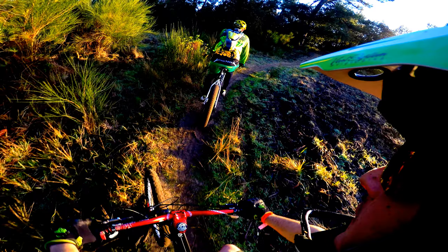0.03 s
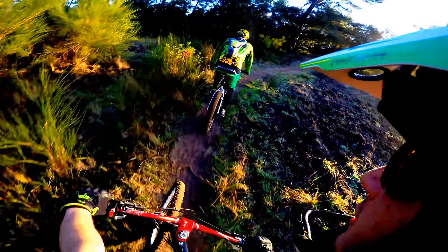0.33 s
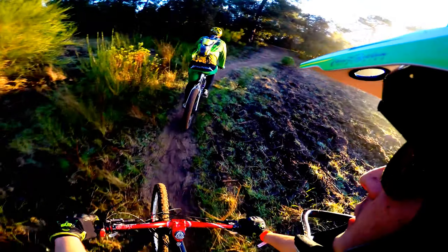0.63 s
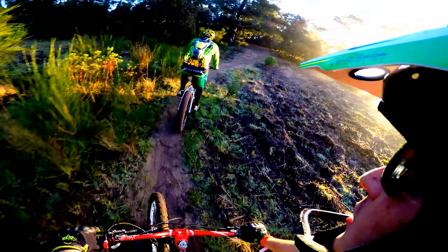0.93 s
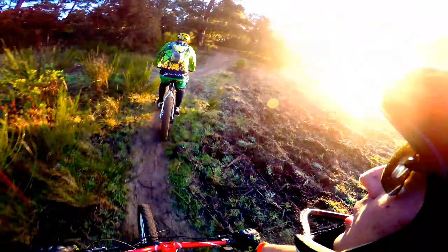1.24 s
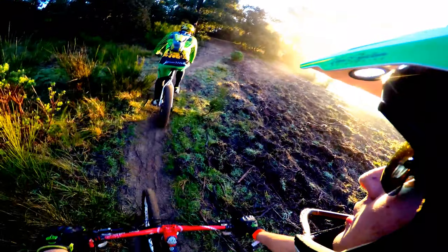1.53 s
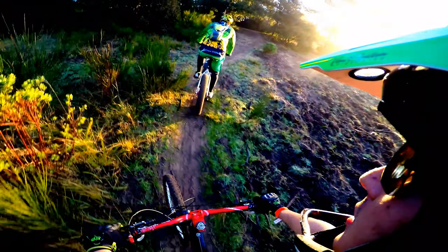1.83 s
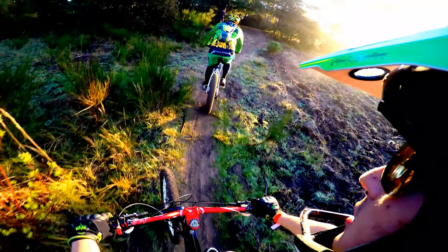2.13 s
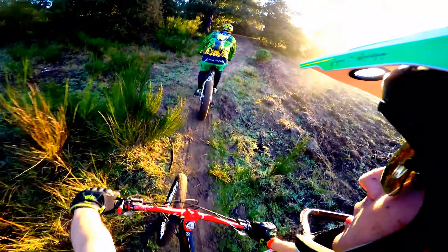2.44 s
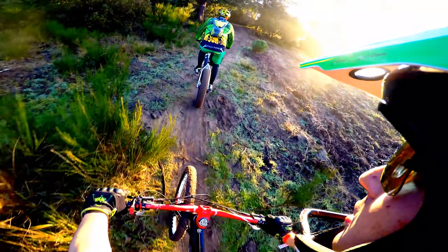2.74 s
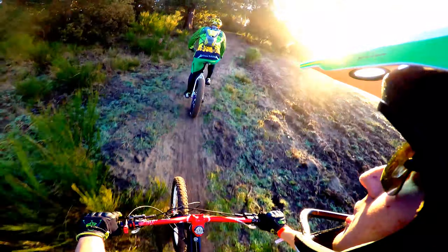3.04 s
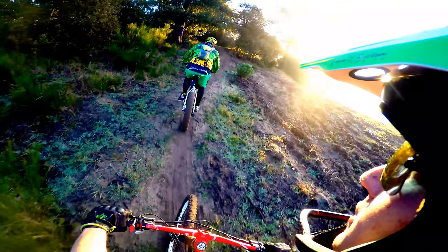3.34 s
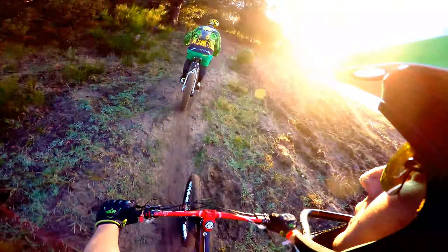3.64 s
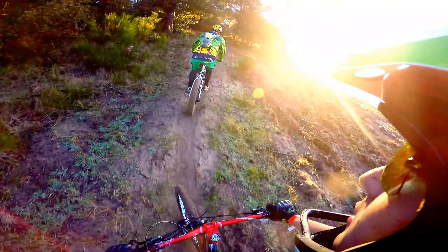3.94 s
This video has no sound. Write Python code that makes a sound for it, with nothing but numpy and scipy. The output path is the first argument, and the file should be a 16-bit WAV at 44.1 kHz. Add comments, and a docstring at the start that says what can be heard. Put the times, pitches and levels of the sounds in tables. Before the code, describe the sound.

Low, gusty wind rumbles on the microphone on a mountain bike rider's helmet. Beneath it, tyres crunch along a dirt trail with small rattles and brushing plants. Twigs crack against the bike halfway through, followed by a bump and one last twig.

```python
"""A mountain bike on a dirt trail, heard from a camera on the rider's helmet.
It cuts in on wind buffeting the mic, tyres droning over grit, loose parts ticking and a shrub
swishing past. A bump booms, a thin ring grazes by, then eddies thump and the tread briefly hums.
Around two seconds in, twigs snap against the bike and set its metal clacking; more rattles, another
bump and a last twig follow. The camera's case colours the bike and the plants, but not the wind."""
import sys
import numpy as np
from scipy import signal
from scipy.fft import rfft, irfft
from scipy.io import wavfile
from scipy.ndimage import uniform_filter1d

SR = 44100
rng = np.random.default_rng(int(sys.argv[2]) if len(sys.argv) > 2 else 0)


def pcm_store(signal):
    """Save signal as 16-bit PCM."""
    levels = np.round(np.clip(np.atleast_2d(signal), -1, 1) * 32767)
    wavfile.write(sys.argv[1], SR, levels.astype(np.int16).T)


N = 176400
TIME = np.arange(N) / SR

# wind on the mic: t/s, buffet level/dB, flutter level/dB
GUSTS = [(.1, -37, -51), (.53, -38, -53), (.6, -37, -48), (.89, -32.5, -44), (1.19, -30, -47),
         (1.31, -27, -34.5), (1.4, -30, -42), (1.9, -35.5, -42.5), (2.0, -24, -39.5), (2.18, -29, -39),
         (2.3, -24.5, -31.5), (2.38, -25, -37), (2.66, -28.5, -37.5), (2.92, -33, -40.5), (3.2, -27, -39),
         (3.4, -28.5, -35.5), (3.68, -32.5, -35), (3.97, -26.5, -38)]
# EQ curves of deep buffet, faster flutter, tread, dirt, leaves and twig crack: f/Hz, level/dB
BUFFET_EQ = [(8, -12), (22, -1), (38, 0), (62, -2), (88, -10), (140, -26), (300, -55), (900, -90)]
FLUTTER_EQ = [(40, -32.5), (90, 4.5), (125, 0.5), (200, -9), (300, -17.5), (450, -33.5), (800, -53),
              (3000, -62.5)]
TREAD_EQ = [(80, -4), (220, -3), (320, 1.5), (420, -2), (540, -10), (700, -20.5), (1100, -31.5),
            (4000, -63)]
DIRT_EQ = [(200, 8.5), (700, 4), (1050, 0), (1450, 1), (2300, -1.5), (3800, -4.5), (5200, -5), (6200, -7.5),
           (6900, -13), (9000, -16), (15000, -18)]
LEAF_EQ = [(300, -20), (900, -8), (1500, -1.5), (3000, 0), (3600, -5), (5400, -3), (7200, -11), (9500, -20),
           (13000, -22), (15000, -29)]
CRACK_EQ = [(800, -22), (2000, -9), (2900, 0), (5000, -3.5), (7000, -14), (10000, -21), (13000, -18),
            (15000, -28)]
# tyres on the ground: t/s, drone level/dB, dirt level/dB
ROLL = [(.1, -48, -59.5), (.2, -53.5, -55.5), (.3, -51.5, -56), (.5, -49, -56), (.85, -51.5, -58),
        (1.0, -50.5, -58), (1.3, -48.5, -57.5), (1.7, -51, -57.5), (2.2, -48.5, -54), (2.42, -52.5, -60.5),
        (2.62, -45.5, -57.5), (2.82, -52, -56.5), (3.25, -50, -59.5), (3.42, -48.5, -55), (3.7, -50, -57.5),
        (3.98, -51, -57)]
# plants brushing past: peak t/s, level/dB, rise/s, fall/s, brightness/dB
SWISHES = [(.1, -57, 0.022, 0.036, 5.5), (.54, -64.5, 0.04, 0.04, 14), (1.0, -69, 0.045, 0.057, 26),
           (1.475, -58.5, 0.035, 0.042, 15), (1.963, -52.5, 0.018, 0.03, 6),
           (2.083, -49.5, 0.03, 0.048, -4), (2.47, -62.5, 0.077, 0.075, 7), (3.42, -62.5, 0.11, 0.093, -37),
           (3.5, -67, 0.057, 0.028, 15), (3.86, -61.5, .012, 0.038, 14)]
# modes of spokes and frame: f/Hz, level/dB, t60/s
METAL_MODES = [(2584, -3, .028), (2915, -1, .055), (3235, 0, .036), (3840, 0, .03), (4620, -1, .05),
               (5400, -4, .03)]
# knocks of loose parts and stones: t/s, level/dB, f/Hz, width/octaves, fade/s
RATTLES = [(0.091, -50.5, 2200, 0.13, 0.0054), (.119, -44, 694, 0.46, 0.0036),
           (0.286, -48, 1220, 0.41, 0.0037), (0.441, -47.5, 2070, 0.12, 0.0057),
           (.806, -52, 1700, 1.07, 0.0034), (1.171, -53, 2380, 0.59, 0.0018),
           (1.225, -59, 5600, 0.16, .005), (1.376, -56.5, 5200, 0.99, 0.003),
           (2.153, -47.5, 1900, 0.42, 0.0092), (2.382, -52, 2190, 0.27, 0.0039),
           (2.545, -51, 1880, 0.8, 0.0025), (2.851, -53, 1600, 0.86, 0.0042),
           (2.949, -54.5, 11000, 0.53, 0.0015), (3.032, -51, 890, 0.15, 0.0055),
           (3.05, -56, 8500, 1.5, .003), (3.14, -61, 13500, .2, .001), (3.146, -51, 2200, 0.94, 0.0024),
           (3.318, -50.5, 4700, 0.28, 0.01), (3.634, -43.5, 730, 0.67, 0.0029),
           (3.651, -51, 4120, 0.55, 0.0013)]
# a wheel meets a bump: t/s, level/dB
BUMPS = [(.29, -40), (3.318, -42)]
# thin rings of rubbed metal: t/s, length/s, f/Hz, level/dB
RINGS = [(.335, 0.094, 3480, -66.5), (3.23, .08, 4810, -69)]
# strong eddies hitting the mic: t/s, level/dB, f/Hz
EDDIES = [(0.603, -26.5, 60), (0.711, -20.5, 45.3), (1.25, -19, 42.4), (2.114, -17.5, 54),
          (2.307, -19, 59.4), (3.449, -19, 48), (3.862, -26, 70.6)]
# the tread humming on firm ground: t/s, length/s, f/Hz, level/dB
HUMS = [(.72, .14, 400, -56), (.9, .13, 570, -59.5)]
# twigs whipping the bike: t/s, level/dB, brightness/dB, clack centre f/Hz
TWIGS = [(1.9263, -44.5, -3, 3450), (1.942, -47.5, -2, 3000), (1.9767, -40.5, 10, 3600),
         (2.0121, -42.5, -7, 2650), (2.0415, -49, -10, 2850), (2.0775, -45, -9, 2950),
         (2.216, -54, -9, 3300), (3.847, -49, 24, 3500)]
# resonances of the camera's case: f/Hz, width/Hz, lift/dB
CASE_MODES = [(1480, 300, 2), (2950, 300, 3.5), (3250, 120, 2.5), (3900, 400, -1), (4660, 350, 3.5),
              (6100, 250, 3.5)]


def amp(db):
    """Decibels to gain."""
    return 10 ** (np.asarray(db) / 20)


def unit(x):
    """Scales to an rms of one."""
    return x / np.sqrt(np.mean(x ** 2) + 1e-20)


def add(mix, s, sound):
    """Drops a sound into the mix at s seconds."""
    part = mix[max(round(s * SR), 0):][:len(sound)]
    part += sound[:len(part)]


def fader(table, column):
    """Gain over time from one dB column of a table."""
    rows = np.array(table)
    return amp(np.interp(TIME, rows[:, 0], rows[:, column]))


def bins(x):
    """Frequencies of a sound's spectrum."""
    return np.maximum(np.fft.rfftfreq(len(x), 1 / SR), 1)


def shape(x, gains):
    """Filters with one gain per frequency, then scales to unit level."""
    return unit(irfft(rfft(x) * gains, len(x)))


def colour(x, eq, bright_db=0, shelf_hz=1):
    """Applies an EQ curve and a high shelf, at unit level."""
    hz, db = np.transpose(eq)
    curve_db = np.interp(np.log(bins(x)), np.log(hz), db)
    shelf_db = bright_db / (1 + (shelf_hz / bins(x)) ** 4)
    return shape(x, amp(curve_db + shelf_db))


def band(count, hz, octaves):
    """Noise around a pitch, at unit level."""
    noise = rng.standard_normal(count)
    return shape(noise, np.exp(-.5 * (np.log2(bins(noise) / hz) / octaves) ** 2))


def wobble(depth_db, rate_hz):
    """A random, smoothly swelling gain."""
    noise = rng.standard_normal(N)
    drift = shape(noise, 1 / (1 + (bins(noise) / rate_hz) ** 2))
    return unit(amp(depth_db * drift))


def steady_noise(eq, steady_s=.24):
    """Coloured noise with its slow swells levelled out."""
    noise = colour(rng.standard_normal(N), eq)
    size = int(steady_s * SR)
    power = uniform_filter1d(uniform_filter1d(noise ** 2, size), size)
    return noise / np.sqrt(power + 1e-9)


def grains(per_s, spread_db):
    """Random tiny impacts, some stronger than the rest."""
    strength = amp(spread_db * np.minimum(rng.exponential(1, N), 4))
    polarity = np.sign(rng.standard_normal(N))
    hits = rng.random(N) < per_s / SR
    return unit(strength * polarity * hits)


def strike(t, rise_s, fade_s):
    """Envelope of a small impact, peaking at one."""
    envelope = (1 - np.exp(-t / rise_s)) * np.exp(-t / fade_s)
    return envelope / envelope.max()


def wind():
    """Large eddies buffet the mic and smaller ones flutter over it."""
    buffet = steady_noise(BUFFET_EQ) * wobble(depth_db=2, rate_hz=26) * fader(GUSTS, column=1)
    flutter = steady_noise(FLUTTER_EQ) * wobble(depth_db=1, rate_hz=28) * fader(GUSTS, column=2)
    return buffet + flutter


def tyres():
    """The knobbly tread drones; dirt hisses and grit crunches under it."""
    drone = steady_noise(TREAD_EQ) * wobble(depth_db=1.5, rate_hz=41) * fader(ROLL, column=1)
    hiss = rng.standard_normal(N)
    grit = amp(-6) * grains(per_s=500, spread_db=2)
    dirt = colour(hiss + grit, DIRT_EQ) * wobble(depth_db=1.4, rate_hz=14) * fader(ROLL, column=2)
    return drone + dirt


def whine(hz=13277, db=-89):
    """A very faint, steady high tone."""
    return amp(db) * unit(np.sin(2 * np.pi * hz * TIME))


def shrubs(stem_share=.57):
    """Leaves and stems scrape past in swells of fine crackle."""
    out = np.zeros(N)
    for s, db, rise_s, fall_s, bright_db in SWISHES:
        stems = grains(per_s=1500, spread_db=3)
        scrape = stem_share * stems + (1 - stem_share) * rng.standard_normal(N)
        swell = np.exp(-.5 * ((TIME - s) / np.where(TIME < s, rise_s, fall_s)) ** 2)
        out += amp(db) * swell * colour(scrape, LEAF_EQ, bright_db, shelf_hz=3460)
    return out * wobble(depth_db=.5, rate_hz=160)


def struck_metal(t, weights):
    """The modes of spokes and frame die away, each with its own strength."""
    return sum(weight * amp(db) * np.exp(-np.log(1000) * t / t60) * np.sin(2 * np.pi * hz * t)
               for weight, (hz, db, t60) in zip(weights, METAL_MODES))


def scraped_metal(leaves, relative_db=-13):
    """Spokes and frame ring faintly as leaves scrape over them."""
    response = struck_metal(TIME[:SR // 4], np.ones(len(METAL_MODES)))
    ringing = unit(signal.fftconvolve(leaves, response)[:N])
    return amp(relative_db) * np.std(leaves) * ringing


def rattles(click_db=-2, click_fade_s=.0012):
    """Loose parts and stones knock: a wide click, then a well damped body around its own pitch."""
    out, t = np.zeros(N), TIME[:SR // 10]
    for s, db, hz, octaves, fade_s in RATTLES:
        click = amp(click_db) * np.exp(-t / click_fade_s) * band(len(t), hz, octaves=.8)
        body = strike(t, rise_s=.00067, fade_s=fade_s) * band(len(t), hz, octaves)
        add(out, s, amp(db) * (click + body))
    return out


def bumps():
    """Tyre and frame give a short hollow boom as a wheel meets a bump."""
    out, t = np.zeros(N), TIME[:SR // 10]
    envelope = strike(t, rise_s=.008, fade_s=.016)
    for s, db in BUMPS:
        add(out, s, amp(db) * envelope * band(len(t), hz=310, octaves=.33))
    return out


def brake_rings(half_width_hz=74):
    """A narrow metal resonance swells and fades, as of a brake disc grazing its pad."""
    out = np.zeros(N)
    for s, length_s, hz, db in RINGS:
        rub = rng.standard_normal(N)[:int(length_s * SR)]
        tone = shape(rub, 1 / (1 + ((bins(rub) - hz) / half_width_hz) ** 2))
        add(out, s, amp(db) * np.sqrt(np.hanning(len(rub))) * tone)
    return out


def eddy_thumps(width_cycles=.43):
    """An eddy passing the mic gives one or two swings of pressure and a puff of flutter."""
    out = np.zeros(N)
    puff = band(N, hz=170, octaves=.42) * fader(GUSTS, column=2)
    for s, db, hz in EDDIES:
        cycles = (TIME - s) * hz
        swing = amp(db) * np.sin(2 * np.pi * (cycles + rng.random()))
        swell = np.exp(-.5 * (cycles / width_cycles) ** 2)
        out += swell * (swing + puff)
    return out


def tread_hums(glide_per_s=.9):
    """The knobs drum in step for a moment: a rough tone that rises slightly."""
    out = np.zeros(N)
    for s, length_s, hz, db in HUMS:
        t = np.arange(-length_s / 2, length_s / 2, 1 / SR)
        cycles = np.cumsum(hz * (1 + glide_per_s * t)) / SR
        tone = unit(np.sin(2 * np.pi * cycles))
        add(out, s, amp(db) * np.sqrt(np.hanning(len(t))) * tone)
    return out * wobble(depth_db=4, rate_hz=75)


def twigs(crack_db=-1, clack_db=2.5, clack_octaves=.22):
    """Each twig cracks and sets the metal clacking at a pitch that depends on where it lands."""
    out, t = np.zeros(N), TIME[:SR // 10]
    envelope = amp(crack_db) * strike(t, rise_s=.0003, fade_s=.003)
    mode_hz = np.array(METAL_MODES)[:, 0]
    for s, db, bright_db, hz in TWIGS:
        weights = 1 / (1 + (np.log2(mode_hz / hz) / clack_octaves) ** 2)  # favours modes near hz
        clack = amp(clack_db) * struck_metal(t, weights / np.linalg.norm(weights))
        crack = envelope * colour(rng.standard_normal(len(t)), CRACK_EQ, bright_db, shelf_hz=9000)
        add(out, s, amp(db) * (clack + crack))
    return out


def camera_case(x):
    """The camera's case colours the treble with its resonances."""
    for hz, width_hz, lift_db in CASE_MODES:
        b, a = signal.iirpeak(hz, hz / width_hz, SR)
        x = x + (amp(lift_db) - 1) * signal.lfilter(b, a, x)
    return x


def scene():
    """The mono mix: wind straight on the mic, bike and plants through the case."""
    leaves = shrubs()
    bike = tyres() + tread_hums() + bumps() + rattles() + brake_rings() + scraped_metal(leaves)
    return (wind() + eddy_thumps() + camera_case(bike + leaves + twigs()))[None]


def record(dry):
    """Lays the whine under the mix, cuts in hard and trims the very top."""
    start_s, cutoff_hz = .0895, 15350
    gated = (dry + whine()) * (TIME >= start_s)
    lowpass = signal.firwin(511, cutoff_hz, window=("kaiser", 9), fs=SR)
    return signal.oaconvolve(gated, lowpass[None], "same")


dry = scene()
out = record(dry)
pcm_store(out)
```